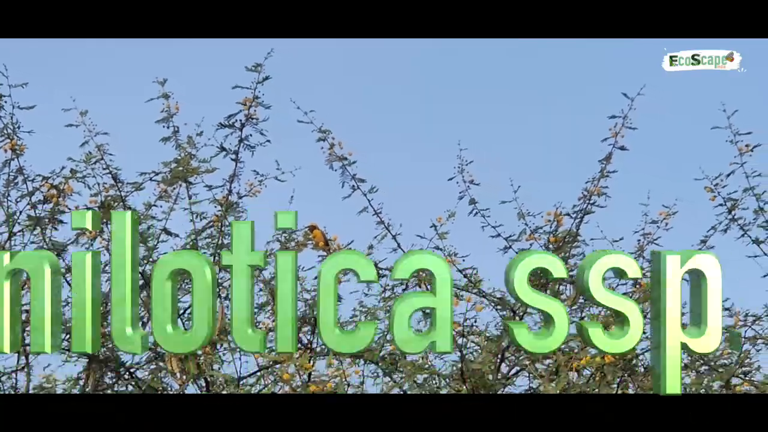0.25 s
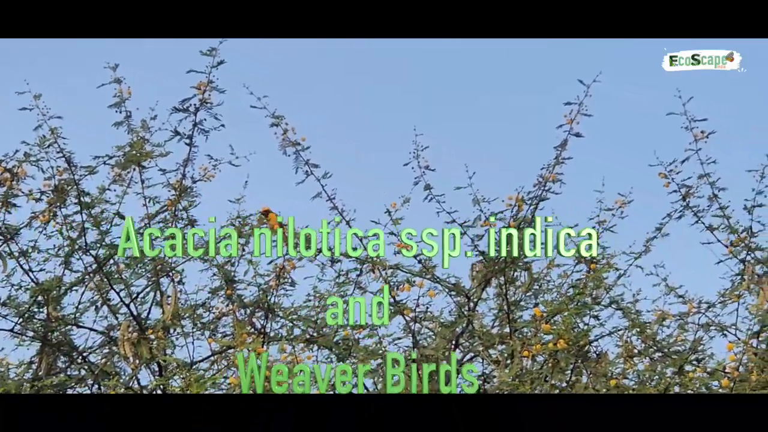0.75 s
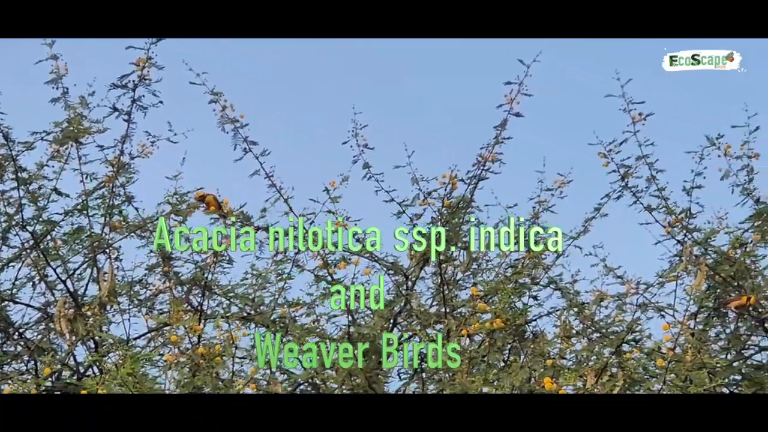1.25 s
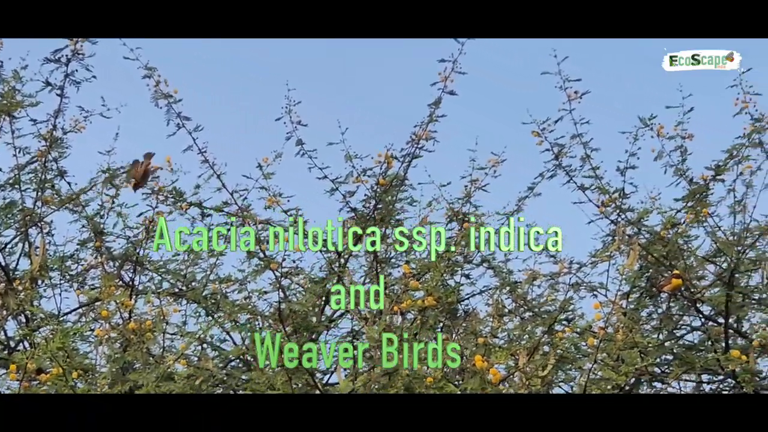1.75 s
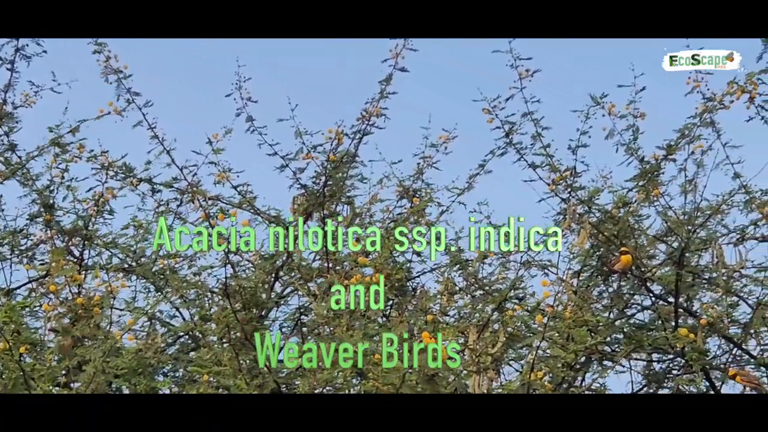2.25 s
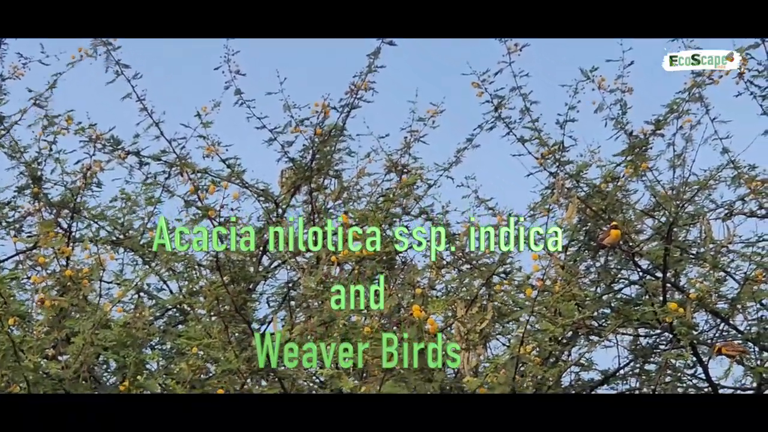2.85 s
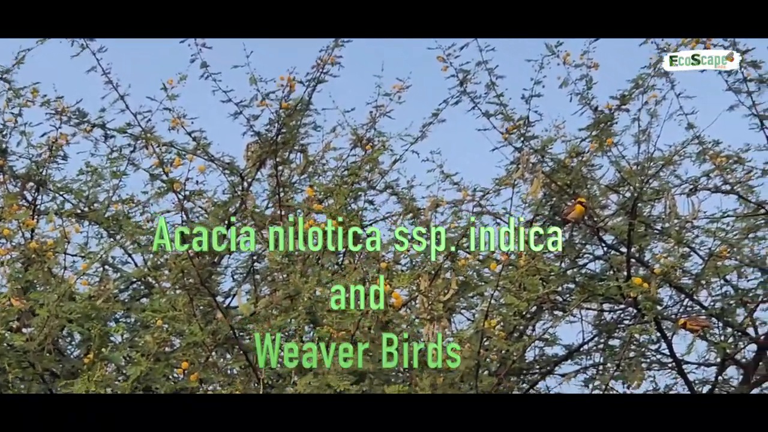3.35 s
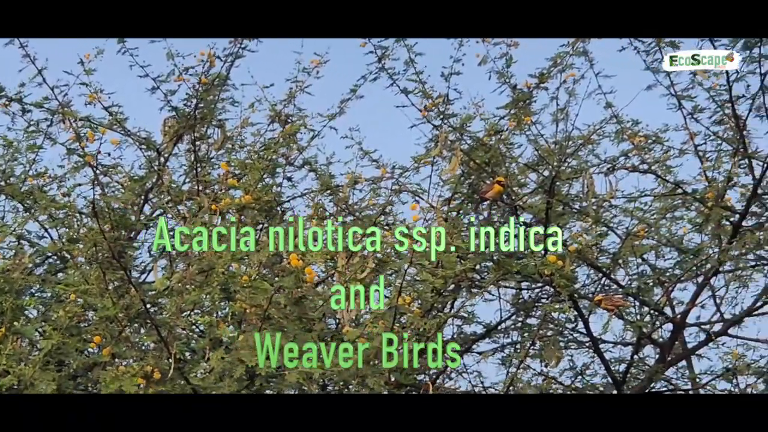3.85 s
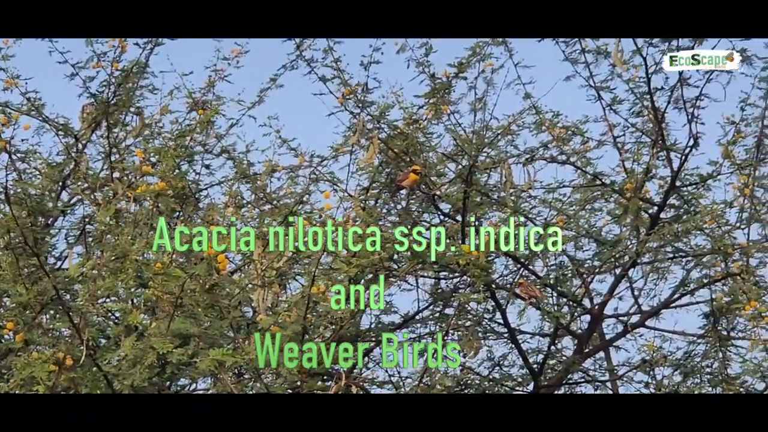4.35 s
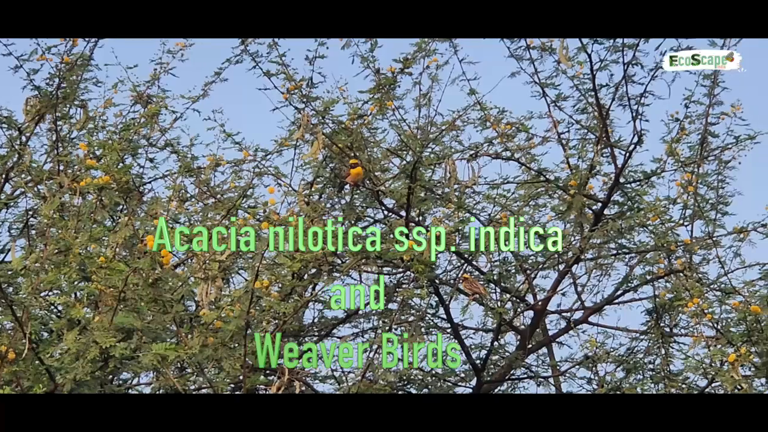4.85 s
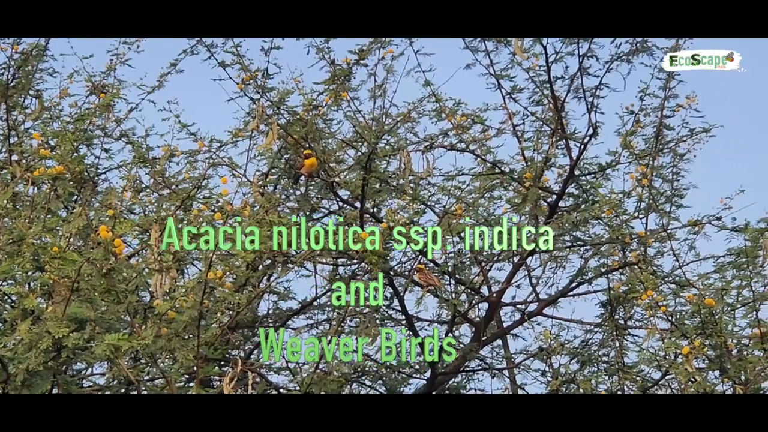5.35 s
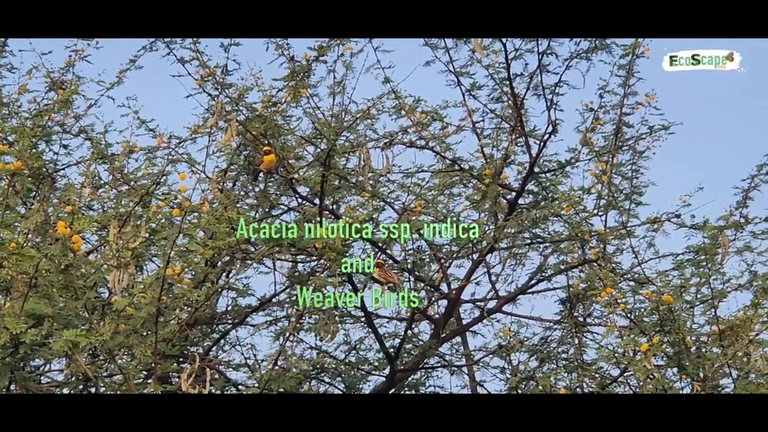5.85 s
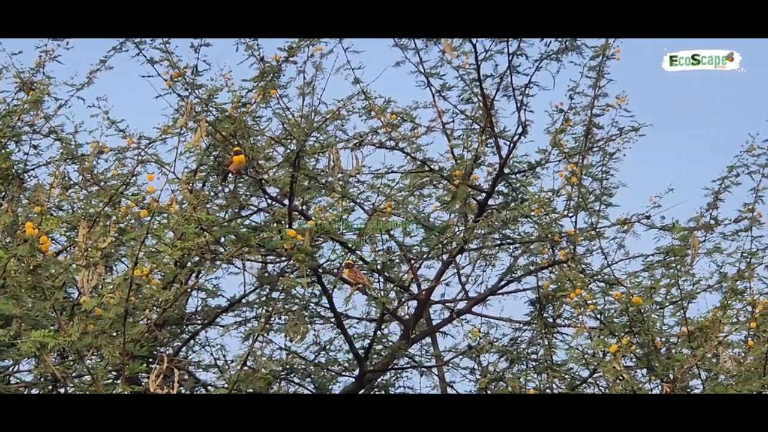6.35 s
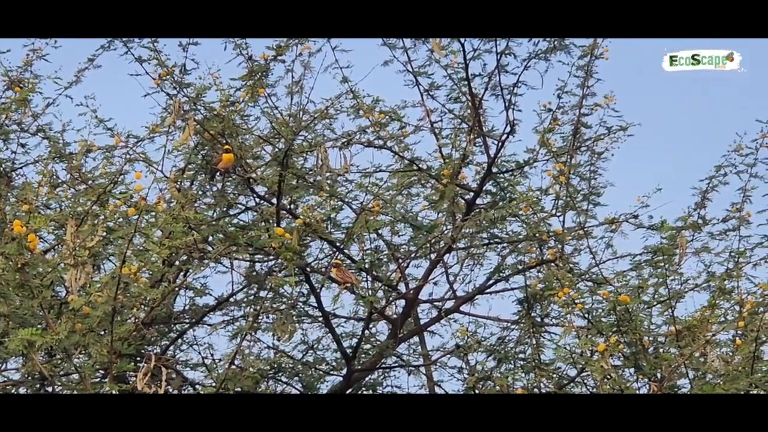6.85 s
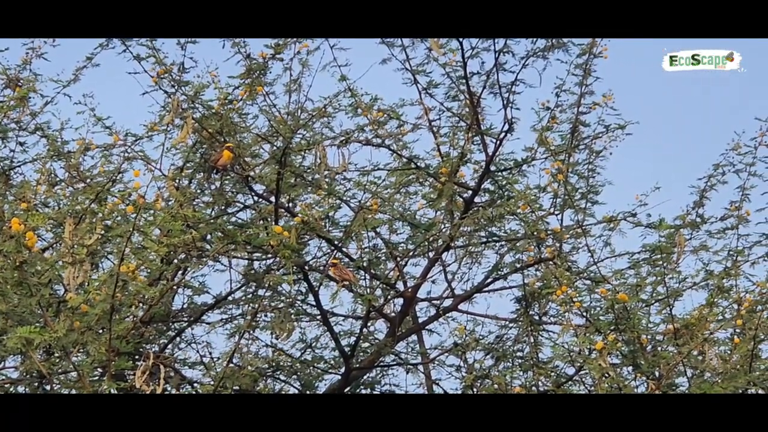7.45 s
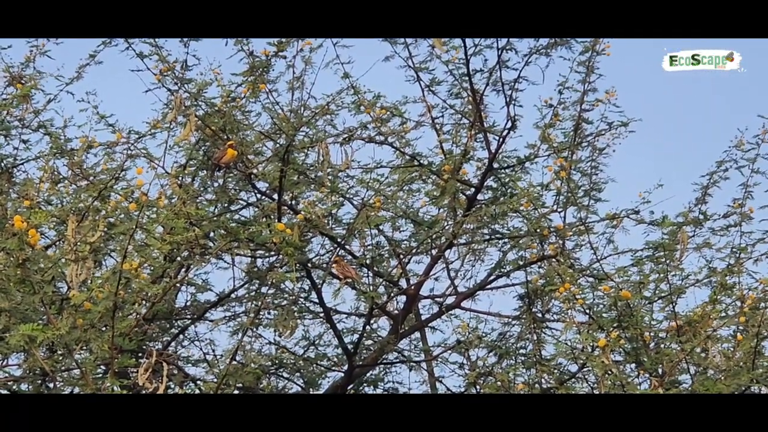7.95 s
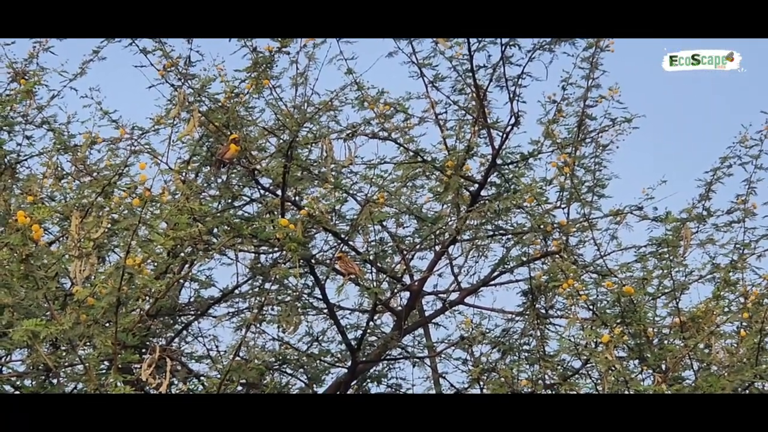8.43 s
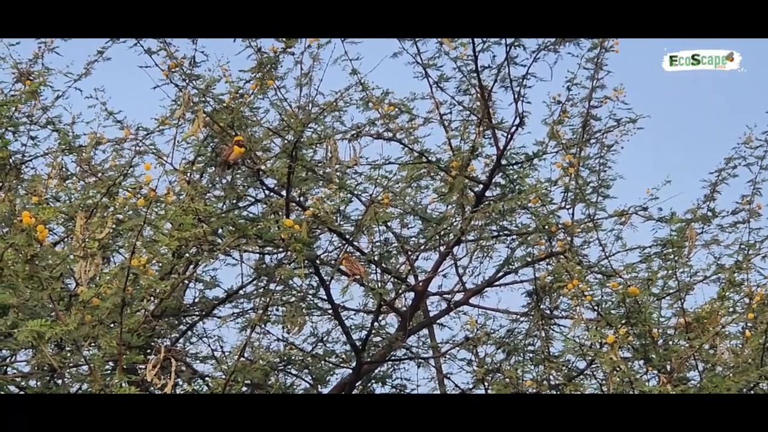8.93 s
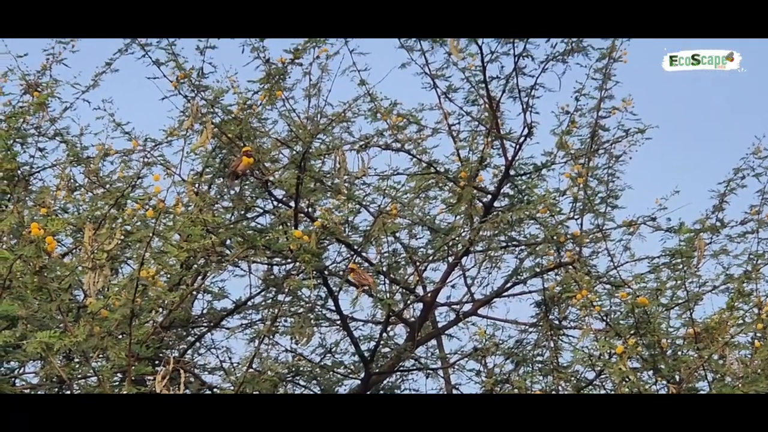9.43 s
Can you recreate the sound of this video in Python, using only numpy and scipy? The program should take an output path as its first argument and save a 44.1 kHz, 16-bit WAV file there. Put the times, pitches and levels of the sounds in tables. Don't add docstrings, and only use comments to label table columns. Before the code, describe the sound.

Outdoor bird colony chatter: a buzzing wheeze, sharp chips, bubbling warbles, soft rattles, a loud whistle and more wheezes above a low windy rumble.

```python
import sys
import numpy as np
from scipy import signal
from scipy.fft import rfft, irfft, next_fast_len
from scipy.io import wavfile
from scipy.ndimage import uniform_filter1d

SR = 44100
rng = np.random.default_rng(int(sys.argv[2]) if len(sys.argv) > 2 else 0)


def dump_mix(stems):
    frames = np.atleast_2d(stems).T
    limited = np.clip(frames, -1, 1)
    pcm = np.round(limited * 32767).astype(np.int16)
    wavfile.write(sys.argv[1], SR, pcm)


def volts_from_db(level):
    exponent = np.asarray(level, float) / 20
    return 10 ** exponent


N = 427329


def evened(x):
    return x / np.sqrt(np.mean(x ** 2) + 1e-20)


def read(points, hz):
    f, value = np.transpose(points)
    return np.interp(np.log(hz + 1), np.log(f + 1), value)


def add(mix, s, sound):
    part = mix[max(round(s * SR), 0):][:len(sound)]
    part += sound[:len(part)]


def spread(rows):
    s, *columns = np.transpose(rows)
    t = np.arange(s[0], s[-1], 1 / SR)
    return t, *(np.interp(t, s, c) for c in columns)


def burst(start, length, db, hz, swell):
    start_db, share, end_db = swell
    return [(start, db + start_db, hz), (start + share * length, db, hz), (start + length, db + end_db, hz)]


def wander(size, per_s):
    knots = rng.standard_normal(round(size / SR * 400) + 2)
    knots = signal.lfilter([1], [1, -np.exp(-2 * np.pi * per_s / 400)], knots)
    return evened(np.interp(np.arange(size) / SR * 400, np.arange(len(knots)), knots))


def hoarse(size, depth):
    flutter = uniform_filter1d(uniform_filter1d(rng.standard_normal(size), size=30), size=30)
    return 1 + depth * evened(flutter)


def resonate(x, hz, width):
    band = [hz - width / 2, hz + width / 2]
    return signal.sosfilt(signal.butter(3, band, "bandpass", fs=SR, output="sos"), x)


def syrinx(hz, second_db=-26, third_db=-24):
    turn = 2 * np.pi * np.cumsum(hz) / SR
    overtones = volts_from_db(second_db) * np.sin(2 * turn) + volts_from_db(third_db) * np.sin(3 * turn)
    return np.sqrt(2) * (np.sin(turn) + overtones)


# (frequency [Hz], likeness [-1 to 1])
PORT_LIKENESS = [(60, 0.59), (180, 0.75), (550, 0.41), (1650, 0.1), (4970, -0.02), (15000, -0.07)]


def wide_noise(db_of, size, patchy_db):
    hop = size // 4
    t, hz = np.arange(N // hop + 5) * hop / SR, np.fft.rfftfreq(size, 1 / SR)
    a, b, c, d, patches = rng.standard_normal((5, len(hz), len(t)), dtype=np.float32)
    patches = evened(uniform_filter1d(uniform_filter1d(patches, size=10, axis=0), size=10, axis=1))
    same = np.clip(read(PORT_LIKENESS, hz), -1, 1)[:, None]
    left = a + 1j * b
    right = same * left + np.sqrt(1 - same ** 2) * (c + 1j * d)
    z = np.array([left, right]) * volts_from_db(db_of(hz[:, None], t) + patchy_db * patches)
    sound = signal.istft(z.astype(np.complex64), nperseg=size, noverlap=size - hop)[1]
    return sound[:, size // 2:][:, :N]


# (frequency [Hz], level [dB per Hz])
RUMBLE_COLOUR = [(12, -53), (20, -16), (43, 2.5), (60, 2), (125, -7.5), (200, -17.5), (242, -30),
                 (431, -47.5), (500, -49), (650, -48), (1100, -120)]
# (time [s], level [dB], extra wind on the left port [dB])
GUSTS = [(0.0, -36.5, -0.5), (0.27, -43, 1), (1.4, -44.5, 2.5), (1.46, -37.5, 5), (1.52, -45, 3),
         (2.32, -45, 0.5), (4.05, -48.5, 0), (4.21, -37.5, -4), (4.29, -46.5, 0), (4.45, -45.5, 0),
         (6.5, -44.5, 1.5), (7.0, -42.5, 7), (7.301, -38, 10.5), (7.55, -44.5, 5.5), (8.64, -43, -3),
         (8.72, -37.5, 14), (8.85, -51, 4), (9.12, -40, 11), (9.69, -40, 8)]


def rumble():
    s, level_db, left_db = np.transpose(GUSTS)

    def colour(hz, t):
        tilt_db = np.interp(t, s, 0.35 * left_db)
        return read(RUMBLE_COLOUR, hz) + tilt_db * np.clip(np.log2(hz / 60 + 1e-3), -1, 2.5)

    t = np.arange(N) / SR
    port_db = [np.interp(t, s, level_db + side * (left_db + 4.5)) for side in (.5, -.5)]
    return volts_from_db(port_db) * evened(wide_noise(colour, size=4096, patchy_db=1.5))


# (frequency [Hz], level [dB per Hz])
AIR_COLOUR = [(150, -35), (250, -3.5), (860, -10.5), (1950, -6.5), (3520, -10), (3980, -14), (4820, 1.5),
              (5540, -2), (5930, -46), (6250, -17.5), (7700, 1), (9010, -6.5), (9830, -65), (14400, -29),
              (16000, -34)]
# (time [s], level [dB])
TOWN = [(0.0, -56.5), (2.34, -63.5), (6.93, -65.5), (7.34, -60.5), (8.04, -64.5)]


def air():
    s, town_db = np.transpose(TOWN)

    def colour(hz, t):
        return read(AIR_COLOUR, hz) + (np.interp(t, s, town_db) + 65.5) / (1 + (hz / 1800) ** 4)

    return volts_from_db(-51) * evened(wide_noise(colour, size=1024, patchy_db=3.0))


# (wing pitch [Hz], width [Hz], clicks a second [1/s], level [dB])
INSECTS = [(7470, 700, 110, -66.5), (8470, 650, 160, -64), (6430, 330, 93, -70), (4620, 80, 40, -65.5),
           (5250, 620, 83, -70.5)]


def insects():
    out, grain = np.zeros((2, N)), rng.standard_normal((2, N))
    for hz, width, per_s, db in INSECTS:
        turns = np.cumsum(per_s * (1 + 0.011 * wander(N, 1.0))) / SR
        scrape = np.exp(-(turns % 1) / 0.22) * grain
        out += volts_from_db(db + 1.5 * wander(N, 1.0)) * evened(resonate(scrape, hz, width))
    return out


# (time [s], firings a second [1/s], level [dB])
ENGINE = [(1.85, 24.5, -47.5), (2.1, 24.8, -43.5), (2.6, 26.5, -44), (3.0, 27, -45.5), (3.4, 26, -50),
          (3.75, 30.5, -54)]


def engine():
    t, per_s, level_db = spread(ENGINE)
    firings = np.diff(np.floor(np.cumsum(per_s) / SR + .31), prepend=0)
    firings = firings * volts_from_db(1.2 * rng.standard_normal(len(t)))
    out = np.zeros(N)
    add(out, t[0], volts_from_db(level_db) * evened(resonate(resonate(firings, 152.7, 108), 110.0, 149)))
    return out


# (start [s], length [s], pitch [Hz], throat resonance [Hz], level [dB])
SQUAWKS = [(6.248, 0.43, 475, 1360, -70), (7.697, 0.45, 459, 1450, -65.5), (8.32, 0.37, 467, 1530, -59),
           (8.402, 0.14, 329.6, 2400, -50.5), (8.888, 0.33, 457.5, 1510, -59.5),
           (9.39, 0.31, 471, 1620, -59.5), (9.248, 0.19, 584, 586, -64.5)]


def squawks():
    out = np.zeros(N)
    for s, length, hz, throat_hz, db in SQUAWKS:
        size = round(length * SR)
        turns = np.cumsum(hz * np.linspace(1.03, .96, size) * (1 + 0.018 * wander(size, 82))) / SR
        rasp = 2.2 * (1400 / throat_hz) ** 2 * rng.standard_normal(size)
        drive = evened(np.diff(np.floor(turns), prepend=0)) + rasp
        voice = evened(resonate(drive, throat_hz, 0.35 * throat_hz))
        add(out, s, volts_from_db(db + 1.6 * wander(size, 37)) * voice * signal.windows.tukey(size, .4))
    return out


# (time [s], pitch [Hz], level [dB], gaps [0-1])
CACKLE = [(3.19, 580, -66, 1.0), (3.27, 625, -58, 0.95), (3.36, 605, -61, 0.9), (3.5, 590, -66, 0.2),
          (3.61, 577, -66, 0.2)]
# (multiple of the pitch, level [dB])
CACKLE_ORDERS = [(3, -4), (4, -4), (5, 1), (6, 1)]


def cackle():
    t, hz, level_db, gaps = spread(CACKLE)
    turn = 2 * np.pi * np.cumsum(hz * (1 + 0.0127 * wander(len(t), 30))) / SR
    stack = sum(volts_from_db(db) * np.sin(int(k) * turn) for k, db in CACKLE_ORDERS)
    beat = np.cos(2 * np.pi * 28.5 * (t - 3.205) + .5 * wander(len(t), 7.4))
    return t[0], volts_from_db(level_db + 1.0 - 26.0 * gaps * (1 - beat)) * stack * hoarse(len(t), 0.2)


def note(row, shape):
    start, length, top_hz, end_hz, db = row
    top, rounded, hook, loudest, fading_db = shape
    u = np.arange(0, length, 1 / SR) / length
    height = np.clip(1 - abs((u - top) / (1 - top)) ** rounded, 0, 1) ** hook
    return start + u * length, end_hz + (top_hz - end_hz) * height, db - 4 * fading_db * (u - loudest) ** 2


def whistle(t, hz, level_db, burr, per_s=95, sway=.06):
    shake = np.sin(2 * np.pi * np.cumsum(per_s * (1 + 0.069 * wander(len(t), 22))) / SR)
    hz = uniform_filter1d(hz, size=200) * (1 + .004 * wander(len(t), 40) + sway * burr * shake)
    edges = signal.windows.tukey(len(t), min(0.00092 * SR / len(t), 1))
    return t[0], volts_from_db(level_db) * (1 + burr * shake) * syrinx(hz, -46, -50) * edges


# (time from its start [s], pitch [Hz], level [dB])
PHRASE = [(0, 3750, -4), (.015, 3400, -1), (.035, 2700, -2), (.052, 2520, 2), (.078, 2640, -2),
          (.09, 2400, 2), (.11, 1780, 3)]
# (time [s], level [dB])
ENTRIES = [(5.91, -63.5), (6.153, -61.5), (6.391, -61), (6.633, -60), (6.865, -60.5)]


def phrases():
    out = np.zeros(N)
    for s, db in ENTRIES:
        add(out, *whistle(*spread(np.add(PHRASE, (s, 0, db))), .08))
    add(out, *cackle())
    return out


# (share of length at top pitch, roundness, hook, share where loudest, fading [dB])
ARCH = (.4, 2.0, 1.0, .5, 9)
FALL = (0, 1.1, 1.0, .1, 2)
HOOK = (0, 1.0, 4.0, .35, 3)
BURR = (.45, 2.0, 1.0, .5, 4)
HOLD = (0, 1.0, 1.0, .3, 2.5)
# (start [s], length [s], top or first pitch [Hz], end pitch [Hz], level [dB])
ARCHES = [(.55, 0.016, 3130, 2920, -52), (.6, 0.08, 4250, 4140, -55), (2.06, 0.019, 1950, 1900, -57),
          (3.34, 0.033, 2106, 1790, -51), (4.318, 0.1, 3590, 3310, -58.5), (5.05, 0.11, 576, 543, -59.5),
          (5.565, .035, 1934, 1860, -55.5), (5.7, 0.033, 2930, 3020, -55), (7.36, 0.095, 1640, 1410, -61.5),
          (7.45, 0.094, 604, 607, -56.5), (8.62, 0.08, 2390, 2380, -48)]
FALLS = [(1.95, .057, 2430, 2080, -50.5), (2.4, 0.023, 3200, 2320, -67), (6.025, .035, 3000, 2190, -63),
         (6.43, 0.045, 3650, 3300, -64), (6.7, .025, 3920, 2870, -56), (6.79, 0.054, 4000, 2550, -59.5)]
HOOKS = [(0.443, 0.033, 4770, 3220, -40), (.482, 0.042, 2410, 2115, -52), (8.14, 0.074, 3000, 2190, -45.5)]
BURRS = [(.13, 0.062, 2050, 1980, -63.5), (.22, .06, 2055, 2000, -60.5), (.33, 0.049, 2080, 1905, -50),
         (0.384, .012, 1920, 1840, -50), (1.617, 0.016, 2040, 1900, -53), (1.629, .07, 3120, 2950, -58),
         (1.643, 0.02, 4650, 4570, -46), (1.646, 0.048, 2370, 1920, -51.5), (1.822, 0.1, 2980, 2870, -52.5),
         (1.88, 0.12, 3800, 3720, -50), (2.328, 0.053, 4750, 4580, -43), (2.747, 0.039, 4660, 4230, -50),
         (2.847, 0.046, 4600, 4580, -54), (2.897, 0.025, 2340, 2400, -52.5),
         (3.012, 0.054, 2260, 1980, -49), (3.732, .27, 1880, 1760, -64), (4.345, 0.035, 1930, 1800, -58.5),
         (4.67, .115, 2330, 1977, -51), (6.543, 0.16, 5240, 5350, -61), (6.58, 0.083, 2280, 2030, -53),
         (6.595, 0.037, 2620, 2460, -49), (6.655, 0.031, 3730, 3730, -59), (8.0, 0.11, 2900, 3200, -52),
         (7.9, .045, 3200, 2600, -52.5), (8.865, 0.016, 2050, 1870, -47), (8.881, .018, 2856, 2880, -40.5),
         (7.3, .03, 2280, 2100, -63.5)]
HELD = [(0.318, 0.12, 3960, 4120, -42.5), (9.041, 0.25, 2030, 2070, -64.5), (9.257, 0.16, 2043, 2040, -59),
        (9.608, 0.059, 2050, 2130, -58.5)]
PIPS = [(0.898, 0.027, 2770, 2660, -62), (1.042, 0.034, 3000, 2880, -58), (4.15, 0.02, 3170, 3200, -69.5),
        (4.2, 0.017, 2060, 2100, -64.5), (4.232, .03, 3200, 3170, -65), (4.307, 0.017, 3170, 3040, -59.5),
        (4.384, .02, 3160, 3100, -62), (4.516, 0.022, 3100, 3040, -68), (4.595, .016, 3160, 2600, -65),
        (4.841, .014, 3140, 2900, -57), (5.65, .05, 1920, 1880, -66.5), (5.9, 0.048, 1970, 1940, -67.5),
        (6.14, 0.03, 1970, 1930, -73), (6.315, 0.016, 1820, 1770, -72), (6.335, 0.036, 3000, 2940, -67),
        (7.362, 0.013, 3400, 3530, -47.5), (7.495, 0.0085, 3300, 3530, -53),
        (7.645, 0.013, 3350, 3650, -49)]
DIVES = [(1.893, 0.014, 6000, 4660, -65), (2.084, 0.031, 5820, 4770, -56.5), (2.26, 0.035, 6410, 4460, -58),
         (2.521, .024, 6540, 3850, -50), (2.949, 0.03, 6600, 4700, -45.5)]
# (time [s], pitch [Hz], level [dB])
BENDS = [
    [(1.2, 2500, -64), (1.245, 2800, -64), (1.262, 2260, -63), (1.315, 2160, -58)],
    [(5.735, 3310, -66), (5.765, 3630, -54), (5.82, 3390, -56), (5.85, 2770, -56)],
    [(7.1, 3800, -55), (7.142, 3970, -54.5), (7.152, 2950, -45), (7.175, 2305, -49.5), (7.225, 2190, -48.5)],
    [(8.68, 3000, -41), (8.702, 2315, -48), (8.72, 2195, -45), (8.742, 2214, -39), (8.757, 1850, -53)],
    [(8.84, 4396, -36), (8.854, 4234, -32), (8.886, 4045, -32), (8.91, 3760, -39), (8.94, 3720, -33.5),
     (8.954, 3700, -42), (8.98, 3520, -42), (9.028, 3280, -45), (9.045, 2950, -42)],
]
# (time [s], pitch [Hz], level [dB])
RAGGED = [
    [(3.718, 3480, -66), (3.738, 4130, -51.5), (3.76, 4130, -51), (3.795, 3700, -63)],
    [(4.705, 2860, -50), (4.735, 4170, -55), (4.76, 3150, -50), (4.785, 3030, -48), (4.83, 3200, -75)],
]
# (time [s], pitch [Hz], level [dB])
SHIVER = [(7.0, 2950, -68), (7.05, 2810, -54), (7.09, 2886, -56), (7.125, 2950, -63)]
# (time [s], pitch [Hz], level [dB], burr [0-1])
NEAR_WHISTLE = [(8.095, 3850, -44.5, 0.1), (8.118, 3873, -26, 0), (8.168, 3857, -28.5, 0.17),
                (8.185, 3930, -35.5, 0.45), (8.325, 3986, -34, 0.22), (8.345, 3850, -28, 0),
                (8.378, 3556, -29, 0.03), (8.415, 3190, -37.5, 0.14), (8.505, 2790, -45, 0.6)]


def whistlers():
    out = np.zeros(N)
    for rows, shape in (ARCHES, ARCH), (FALLS, FALL), (HOOKS, HOOK):
        for row in rows:
            add(out, *whistle(*note(row, shape), 0.069))
    for rows in BENDS:
        add(out, *whistle(*spread(rows), .096))
    for row in BURRS:
        add(out, *whistle(*note(row, BURR), .7, per_s=78))
    for row in HELD:
        add(out, *whistle(*note(row, HOLD), 0.37, per_s=51))
    for row in PIPS:
        add(out, *whistle(*note(row, HOLD), .2, per_s=60))
    for rows in RAGGED:
        add(out, *whistle(*spread(rows), .35, per_s=120))
    for row in DIVES:
        add(out, *whistle(*note(row, FALL), .3, per_s=200))
    add(out, *whistle(*spread(SHIVER), .8, per_s=62, sway=.11))
    add(out, *whistle(*spread(NEAR_WHISTLE), per_s=150))
    return out


def flick(hz, length, fall, overtone_db):
    size = round(length * SR)
    voice = syrinx(hz * np.geomspace(1 + fall, 1 / (1 + fall), size), overtone_db + 8.5, overtone_db)
    return voice * signal.windows.tukey(size, .7) * hoarse(size, .38)


def fuzz(hz, width):
    t = np.arange(0, .09, 1 / SR)
    breath = evened(resonate(rng.standard_normal(len(t)) * hoarse(len(t), 0.7), hz, width))
    return breath * np.minimum(t / 0.0036, 1) * volts_from_db(-60 * t / .2)


def chips(rows, fuzz_db, width):
    out = np.zeros(N)
    for (s, db, hz), chance in zip(rows, rng.standard_normal((len(rows), 6, 4))):
        add(out, s - .003, volts_from_db(db - 13) * flick(0.83 * hz, .007, 0.17, -16.5))
        add(out, s + .003, volts_from_db(db - 9) * flick(hz, 0.0101, 0.168, -25.5))
        add(out, s - .004, volts_from_db(db + fuzz_db) * fuzz(4350, width))
        for k, (a, b, c, d) in enumerate(chance[1:]):
            low = flick(hz * .9 * .945 ** k * (1 + .04 * d), 0.0096, 0.059, -26)
            high = flick(hz * (1.3 + 0.093 * np.tanh(a)), .007, 0.17, -30)
            add(out, s + .013 + 0.0081 * k + 0.0027 * c, volts_from_db(db - 16.5 - 2.3 * k + 1.9 * a) * low)
            add(out, s + 0.0035 + .0075 * k + .0026 * d, volts_from_db(db - 15 - 0.84 * k + 1.7 * b) * high)
    return out


# (time [s], peak level [dB], centre pitch [Hz])
CHIPS = [(0.7155, -36.5, 4000), (0.824, -40.5, 3760), (0.981, -34, 4090), (1.0863, -33.5, 4040),
         (1.277, -37.5, 4890), (1.412, -37, 4520), (1.553, -38, 5090), (1.6618, -36, 4320),
         (1.763, -36.5, 4190), (2.4558, -34.5, 3990), (2.9487, -31, 4860),
         (1.862, -33, 4280), (1.89, -37, 5260), (2.055, -33.5, 4120), (2.085, -34.5, 5250),
              (2.277, -30, 5520), (2.386, -35, 3870), (2.522, -37, 5120)]
FAR_CHIPS = [(4.6228, -44.5, 5130), (4.805, -42, 4490), (4.907, -42, 4620), (5.028, -42.5, 5150),
             (5.149, -44.5, 4040), (5.2983, -43.5, 5210), (5.866, -51, 3360)]


def chipping():
    return chips(CHIPS, -16, 2600) + chips(FAR_CHIPS, -8, 4500)


def rattle(rows, overtone_db, sink, fall, hiss_db, per_s=100):
    t, level_db, hz = spread(rows)
    hz = hz * np.linspace(1 + sink, 1 - sink, len(t))
    out = np.zeros(len(t) + 1200)
    strained_breath = resonate(rng.standard_normal(len(t)) * hoarse(len(t), .6), 10100, 8000)
    add(out, 0, volts_from_db(level_db + hiss_db) * evened(strained_breath))
    for k in range(0, len(t), round(SR / per_s)):
        a, b, c, d = rng.standard_normal(4)
        main = flick(hz[k] * (1 + 0.0373 * c), 0.01295 * (1 + .15 * np.tanh(d)), fall, overtone_db)
        upper = flick(1.3 * hz[k] * (1 + 0.035 * b), .009, 0.067, -45)
        add(out, k / SR + 0.0013 * abs(a), volts_from_db(level_db[k] - 0.5 + 1.0 * b) * main)
        add(out, k / SR + .004 + 0.0015 * abs(d), volts_from_db(level_db[k] - 5.5 + 2.5 * a) * upper)
    return t[0], out


# (start [s], length [s], level [dB], centre pitch [Hz])
SOFT_RATTLES = [(7.197, 0.072, -45.5, 3770), (7.344, 0.064, -43.5, 3730), (7.476, 0.066, -43, 3780),
                (7.622, 0.088, -41, 3970)]
STRAINED_RATTLES = [(7.714, 0.076, -38, 4360), (7.807, 0.07, -36.5, 4440), (7.892, 0.064, -35.5, 4440)]
# (start [dB], share of the length where the given level is reached, end [dB])
SOFT_SWELL = (-4.5, 0.89, -28)
STRAINED_SWELL = (-2, .6, 0.5)


def rattles():
    out = np.zeros(N)
    for row in SOFT_RATTLES:
        rows = burst(*row, SOFT_SWELL)
        add(out, *rattle(rows, overtone_db=-57, sink=0.036, fall=.34, hiss_db=-58))
    for row in STRAINED_RATTLES:
        rows = burst(*row, STRAINED_SWELL)
        add(out, *rattle(rows, overtone_db=-28, sink=0.109, fall=0.239, hiss_db=-15))
    return out


# (start [dB], share of the length where loudest, end [dB])
WARBLE_SWELL = (-6, 0.88, -14.5)


def warble(first_s, peaks, per_s, trough_hz, db, hurry=1.9, sharp=1.15, rasp=.33):
    lead_s, peak_hz = .056, 0.55 * trough_hz
    t, level_db, height_hz = spread(burst(first_s - lead_s, lead_s + peaks / per_s, db, peak_hz, WARBLE_SWELL))
    turns = (t - first_s) * per_s
    early = turns < -.5
    bounces = np.where(early, -.5 + (turns + .5) * hurry, turns)
    peak = (1 - abs(np.sin(np.pi * bounces))) ** sharp
    reach = np.where(early, .7, 0.78 + 0.069 * turns) * (1 + 0.115 * wander(len(t), 24.4))
    hz = trough_hz * (1 + 0.0254 * wander(len(t), 31.0)) + height_hz * uniform_filter1d(peak * reach, size=130)
    downstrokes = np.where(early & (np.gradient(peak) > 0), .35, 1)
    voice = syrinx(hz, -32, -30) * hoarse(len(t), rasp) * downstrokes
    level = volts_from_db(level_db + 8.1 * peak + 0.32 * wander(len(t), 40))
    return t[0], level * voice * signal.windows.tukey(len(t), .08)


# (first slow peak [s], slow peaks, slow peaks a second [1/s], trough pitch [Hz], level [dB])
WARBLES = [(1.947, 2.44, 43.5, 3190, -46), (2.115, 3.8, 48.7, 3136, -43.5), (2.314, 3, 52, 3315, -41.5),
           (2.558, 2.9, 47, 3097, -43.5), (2.78, 3, 52, 3290, -45), (2.987, 2.9, 44, 3000, -48.5)]
RASPS = [(9.069, 3.9, 45, 2876, -51), (9.29, 3.9, 48, 3140, -49.5), (9.47, 2.6, 50, 3495, -44.5),
         (9.647, 2.0, 48, 3500, -43)]


def warbles():
    out = np.zeros(N)
    for row in WARBLES:
        add(out, *warble(*row))
    for row in RASPS:
        add(out, *warble(*row, rasp=.9))
    return out


# (frequency [Hz], level [dB per Hz])
WHEEZE_COLOUR = [(1410, -3.5), (2400, -6), (2810, -1), (3750, -4.5), (4300, -2), (4800, -7), (5100, -11),
                 (5400, -3.5), (5780, 1.5), (6100, -11.5), (6470, -11), (6840, -33), (7770, -15),
                 (9780, -28.5), (11600, -19), (14800, -24), (16000, -28.5)]


def wheeze(rows, per_s, jitter, throat, crackle_db, breath=0.32):
    t, level_db, lower_db = spread(rows)
    turns = np.cumsum(per_s * (1 + jitter * wander(len(t), 60) + .008 * wander(len(t), 3))) / SR
    other_side = volts_from_db(-1.5) * np.floor(turns + .514)
    pulses = np.diff(np.floor(turns) + other_side, prepend=0) * volts_from_db(1.2 * rng.standard_normal(len(t)))
    hiss = (.35 + np.exp(-(2 * turns % 1) / .3)) * rng.standard_normal(len(t))
    drive = (1 - breath) * evened(pulses) + breath * evened(hiss)
    size = next_fast_len(len(t))
    colour = volts_from_db(read(WHEEZE_COLOUR, np.fft.rfftfreq(size, 1 / SR) / throat))
    voice = evened(irfft(rfft(drive, size) * colour, size)[:len(t)])
    voice = signal.filtfilt(*signal.butter(6, 3700, "high", fs=SR), voice)
    lower = signal.filtfilt(*signal.butter(4, 4900, fs=SR), voice)
    voice += (volts_from_db(lower_db + 0.84 * wander(len(t), 6.2)) - 1) * lower
    level = volts_from_db(level_db + 4.5 + crackle_db * wander(len(t), 37))
    return t[0], level * voice * signal.windows.tukey(len(t), min(600 / len(t), 1))


# (time [s], level [dB], lower resonance [dB])
WHEEZES = [
    [(0.0, -39.5, 3.5), (0.416, -41.5, 4.5), (0.47, -51, 0)],
    [(8.14, -48, -16), (8.22, -38.5, -9), (8.33, -37.5, -5), (8.61, -38.5, -3)],
    [(8.6, -50, 14), (8.63, -39.5, 1.5), (8.958, -42, 8.5), (9.28, -40, 8), (9.69, -40.5, 9)],
]
# (pulses a second [1/s], unevenness, throat resonance factor, crackle [dB])
WHEEZE_VOICES = [
    (243.7, 0.012, 1.0, -0.9),
    (186, 0.18, 0.94, 1),
    (239.7, 0.018, 1.0, -0.3),
]


def wheezes():
    first, later = np.zeros((2, N))
    for perch, rows, voice in zip((first, first, later), WHEEZES, WHEEZE_VOICES):
        add(perch, *wheeze(rows, *voice))
    return first, later


def perched(x, perch, leaves_db, t60):
    size, t = next_fast_len(N + 8000, real=True), np.arange(8000) / SR
    direct = np.exp(np.outer([.5j, -.5j], read(perch, np.fft.rfftfreq(size, 1 / SR))))
    sparse = rng.random((8000, 2)).T < .06
    taps = rng.standard_normal((8000, 2)).T * sparse * volts_from_db(-60 * t / t60) * (t > .002)
    leaves = volts_from_db(leaves_db) * rfft(taps / np.linalg.norm(taps[0]), size)
    return irfft(rfft(x.astype(np.float32), size) * (direct + leaves).astype(np.complex64), size)[:, :N]


# (frequency [Hz], left ahead of right [radians])
WHEEZE_PERCH = [(3000, 3.2), (4100, 3.4), (5700, 2.2), (15000, -10)]
NEAR_PERCH = [(2000, .5), (3300, 1.5), (4600, .8), (6000, 1.6), (15000, 14)]
WARBLE_PERCH = [(2500, .8), (3200, 0), (4500, -1.9), (6000, -3)]
WHISTLE_PERCH = [(0, 4.4), (1980, 0.29), (4390, 8.66), (9300, 20.8)]


def scene():
    first, later = wheezes()
    birds = perched(later, WHEEZE_PERCH, 2, 0.08)
    birds += perched(first + volts_from_db(.8) * rattles() + chipping(), NEAR_PERCH, -3.5, 0.15)
    birds += perched(warbles() + squawks() + phrases(), WARBLE_PERCH, -4.5, .17)
    birds += perched(whistlers(), WHISTLE_PERCH, -8.5, .14) * volts_from_db([[1.8], [-1.8]])
    motor = engine() * volts_from_db([[2.5], [-2.5]])
    return volts_from_db(5.0) * (birds + insects()) + volts_from_db(1.5) * air() + volts_from_db(4.5) * rumble() + motor


def top_cut(x):
    return signal.sosfilt(signal.butter(12, 15850, fs=SR, output="sos"), x)


# (frequency [Hz], left over right [dB])
PORT_LEAN = [(60, -5.5), (180, -3.5), (550, 3), (1650, 3), (4970, -0.5), (15000, 2.5)]


def record(dry):
    size = next_fast_len(N, real=True)
    lean_db = np.outer([.5, -.5], read(PORT_LEAN, np.fft.rfftfreq(size, 1 / SR)))
    mix = irfft(rfft(dry, size) * volts_from_db(lean_db), size)[:, :N]
    return top_cut(mix)


dry = scene()
out = record(dry)
dump_mix(out)
```